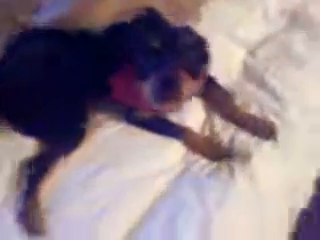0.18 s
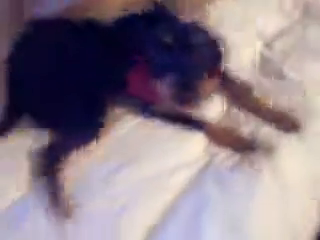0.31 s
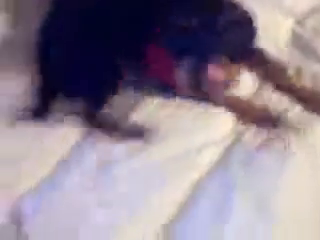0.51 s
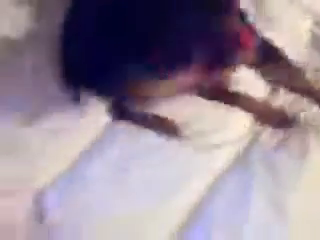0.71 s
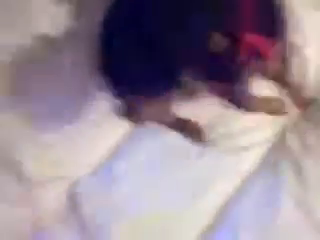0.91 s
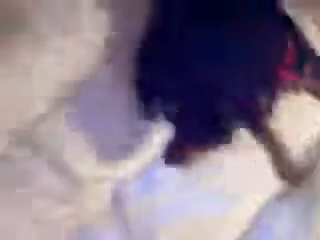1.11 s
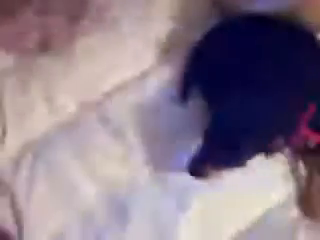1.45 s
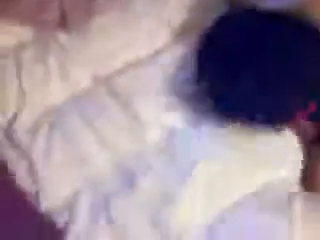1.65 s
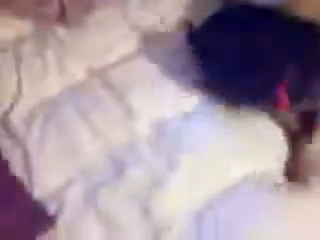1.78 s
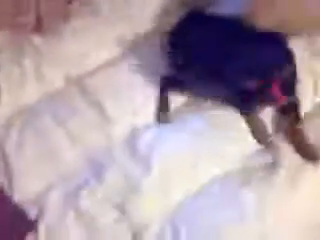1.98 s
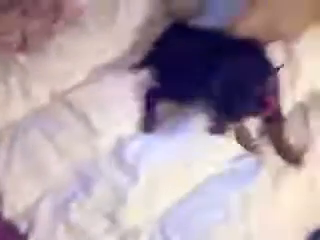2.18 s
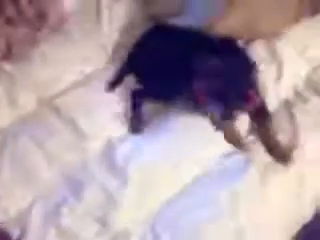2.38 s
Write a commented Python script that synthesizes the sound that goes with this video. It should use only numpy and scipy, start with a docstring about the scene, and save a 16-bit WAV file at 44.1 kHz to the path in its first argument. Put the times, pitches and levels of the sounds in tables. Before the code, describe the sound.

A puppy's teeth clack seven times in an even, quick run growing louder, over light duvet rustle; then a soft paw thump, cloth rubs and faint claw ticks, close stereo microphones in a small furnished room.

```python
"""A puppy plays on a duvet, close by in a small room. First comes a quick run of sharp clacks, most likely its teeth
snapping: each is a few contacts, built from knocks, rings of the mouth and bursts of noise. Cloth rubs beneath, and
one bright claw tick, a short noise burst, falls among the clacks. Then it turns round: paws thump as pulses and a
damped mattress ring, strokes of swelling noise rub the cloth, three faint contacts return and more claws tick near
the end. Two closely spaced microphones, cross-subtracted for stereo width, add their own hiss and a faint whine."""
import sys
import numpy as np
from scipy import signal
from scipy.fft import rfft, irfft, next_fast_len
from scipy.io import wavfile

SR = 44100
rng = np.random.default_rng(int(sys.argv[2]) if len(sys.argv) > 2 else 0)


def transcribe(u):
    """Save the signal u as a 16-bit wav file named by the first command-line argument.

    u: samples, shape (n,) or (channels, n), limited to [-1, 1]; the rate is SR.
    q: integer samples, one column per channel.
    """
    v = np.clip(np.atleast_2d(u).T, -1, 1)
    q = np.round(v * 32767).astype(np.int16)
    wavfile.write(sys.argv[1], SR, q)


N = 112454
FFT_SIZE = next_fast_len(N + 4096, real=True)  # the padding leaves room for delays

# Room
ECHO_S, ECHO_DB = 0.023, -27  # the nearest wall
ROOM_DB, ROOM_T60_S, ROOM_DELAY_S = -21.5, 0.23, 0.0057
# Bedding
CLOTH_FLUTTER_DB, FLUTTER_HZ = 1.57, 69.88
FIBRE_DB, FIBRE_RATE_HZ = 2.7, 1800
# Claws and paws
CLAW_DECAY_S = 0.0011
CLAW_SKIRT_DB = 18  # fall per octave either side of the centre
MATTRESS_HZ, MATTRESS_T60_S = 148, 0.048
CRUSH_DB = -14  # the filling crumples under the paw, relative to the slap
CRUSH_RISE_S, CRUSH_DECAY_S = 0.0031, 0.0095
# Teeth
MOUTH_T60_S = 0.022
MOUTH_RISE_HZ_PER_S = 24000  # the ring climbs as the jaws close
CONTACT_RISE_S, CRACK_DECAY_S = 0.00016, 0.0012
SCRAPE_DECAY_S, SCRAPE_TAIL_S, SCRAPE_TAIL_DB = 0.00047, 0.0043, -18
# Microphones
PORT_LAG_S = 0.00006  # the left microphone hears the puppy later
CROSS_DELAY_S = 0.000381
SELF_NOISE_DB = -63.5  # ahead of the cross-subtraction
WHINE_HZ, WHINE_DB = 12094, -79
TOP_HZ = 14050


def undb(db):
    """Decibels to an amplitude factor."""
    return 10 ** (np.asarray(db) / 20)


def bins():
    """Frequency of every spectral bin."""
    return np.fft.rfftfreq(FFT_SIZE, 1 / SR)


def curve(points):
    """A table over log frequency, read at every spectral bin."""
    hz, value = np.array(points, float).T
    return np.interp(np.log(bins() + 1), np.log(hz), value)


def response(points):
    """Causal (minimum-phase) frequency response of (hz, level_db) points, by folding the cepstrum."""
    cepstrum = irfft(np.log(undb(curve(points))), FFT_SIZE)
    cepstrum[1:FFT_SIZE // 2] *= 2
    cepstrum[FFT_SIZE // 2 + 1:] = 0
    return np.exp(rfft(cepstrum))


def filtered(x, h):
    """Apply a frequency response."""
    return irfft(rfft(x, FFT_SIZE) * h, FFT_SIZE)[..., :N]


def colour(x, points):
    """Filter that keeps the power of white noise."""
    h = response(points)
    return filtered(x, h / np.sqrt(np.mean(abs(h) ** 2)))


def pulse(points):
    """A single push with this spectrum and a peak of 1."""
    x = irfft(response(points), FFT_SIZE)[:N]
    return x / abs(x).max()


def ring(hz, t60, rise_hz_per_s=0):
    """One damped resonance whose pitch may climb."""
    t = np.arange(int(2 * t60 * SR)) / SR
    phase = 2 * np.pi * (hz + rise_hz_per_s * t / 2) * t
    return np.sin(phase) * np.exp(-np.log(1000) * t / t60)


def fade(decay_s):
    """Exponential decay from 1."""
    return np.exp(-np.minimum(np.arange(N) / SR / decay_s, 20))


def soften(x, rise_s):
    """Round off every attack."""
    return filtered(x, np.exp(-(np.pi * bins() * rise_s / 2) ** 2))


def strike(times, dbs, shape):
    """The same shape started at each time with its own level."""
    out = np.zeros(N)
    for s, db in zip(times, dbs):
        i = int(s * SR)
        out[i:i + len(shape)] += undb(db) * shape[:N - i]
    return out


def delay(x, s):
    """Delay by any time, down to a fraction of a sample."""
    return filtered(x, np.exp(-2j * np.pi * bins() * s))


def ports(x):
    """A point source as it reaches the left and right microphones."""
    return np.array([delay(x, PORT_LAG_S), x])


def spread_noise(diffuse):
    """Noise at the two microphones, partly from the puppy's direction and partly from all round."""
    share = np.clip(diffuse, 0, 1)
    direct = ports(rng.standard_normal(N))
    around = rng.standard_normal((2, N))
    return np.sqrt(1 - share) * direct + np.sqrt(share) * around


def walk(rate):
    """Random wander with a spread near 1: straight lines between `rate` random values a second."""
    steps = rng.standard_normal(N)
    return 1.39 * np.interp(np.arange(N) / SR * rate, np.arange(N), steps)


def room(x):
    """The short, faint tail of a softly furnished room: decaying noise convolved with the sound."""
    # Colour of the tail: hz, level_db
    tail_spectrum = [(100, -11), (400, -2), (1200, 6.5), (2500, -3.5), (5000, -7), (9000, -4), (14000, 1)]
    t = np.arange(N) / SR
    tail = rng.standard_normal((2, N)) * np.exp(-np.log(1000) * t / ROOM_T60_S) * (t > ROOM_DELAY_S)
    tail = colour(tail / np.sqrt(np.sum(tail[0] ** 2)), tail_spectrum)
    return undb(ROOM_DB) * signal.fftconvolve(x, tail, axes=1)[:, :N]


def bedding():
    """Each stroke swells and fades: the filling is pushed, the cover rubs unevenly and its fibres hiss."""
    # Strokes of fur and paws over the cloth: centre_s, half_length_s, muffled_push_db, rub_db, hiss_db
    strokes = [(0.146, 0.012, -61.5, -64.5, -62), (0.185, 0.043, -71, -68, -65),
               (0.297, 0.074, -77, -64, -61), (0.383, 0.057, -73, -66, -62),
               (0.474, 0.042, -73, -58.5, -60), (0.596, 0.075, -69.5, -59.5, -62.5),
               (0.72, 0.035, -64.5, -58, -60), (0.818, 0.034, -66, -62, -62.5),
               (0.895, 0.041, -63, -57.5, -59.5), (1.044, 0.055, -63.5, -60, -59.5),
               (1.136, 0.019, -63, -68, -86), (1.312, 0.12, -66.5, -62, -67), (1.384, .024, -63, -55, -73),
               (1.479, .045, -63, -57.5, -65.5), (1.63, 0.1, -69, -66.5, -69),
               (1.745, 0.034, -56.5, -62.5, -83), (1.821, 0.037, -61, -54.5, -54.5),
               (1.934, 0.057, -68, -64, -62.5), (2.087, 0.023, -69.5, -64.5, -63),
               (2.328, 0.17, -67, -65.5, -86), (2.464, 0.024, -61, -59.5, -69)]
    # Colour of the pushed filling: hz, level_db
    push_spectrum = [(60, -24), (200, -5), (400, 2.5), (600, -6), (1000, -9.5), (2500, -40.5)]
    # Colour of the rubbed cover: hz, level_db
    rub_spectrum = [(200, -16.5), (600, 4.5), (900, 1.5), (1400, 0), (2000, -4.5), (3000, -2), (4200, -8),
                    (5200, -13), (14000, -17.5)]
    # Colour of the hissing fibres: hz, level_db
    hiss_spectrum = [(1000, -6), (3000, -31), (4200, -20), (5200, -4.5), (6500, -6), (8500, 1),
                     (11000, -2.5), (14000, -9.5)]
    t = np.arange(N) / SR
    power = np.zeros((3, N))
    for centre, half, *dbs in strokes:
        power += undb(dbs)[:, None] ** 2 * np.exp(-((t - centre) / half) ** 2)
    push, rub, hiss = np.sqrt(power) * undb(CLOTH_FLUTTER_DB * walk(FLUTTER_HZ))
    fibres = undb(FIBRE_DB * (walk(FIBRE_RATE_HZ) - 1 / 2))
    pushed = colour(push * spread_noise(diffuse=0.079), push_spectrum)
    rubbed = colour(rub * fibres * spread_noise(diffuse=0.94), rub_spectrum)
    hissed = colour(hiss * fibres * spread_noise(diffuse=1.0), hiss_spectrum)
    return pushed + rubbed + hissed


def claws():
    """Thin bright ticks of fading noise as a claw slips off the weave."""
    # Claws catching the sheet: start_s, level_db, tick_centre_hz
    catches = [(0.438, -37, 9200), (2.4347, -39, 5500), (2.4440, -42, 4180), (2.4636, -52, 12000),
               (2.478, -51, 10800), (2.4890, -52.5, 10800)]
    slip = spread_noise(diffuse=0.84)
    out = np.zeros((2, N))
    for s, db, hz in catches:
        skirts = [(hz / 2 ** 2, -2 * CLAW_SKIRT_DB), (hz, 0), (2 * hz, -CLAW_SKIRT_DB)]
        out += colour(strike([s], [db], fade(CLAW_DECAY_S)) * slip, skirts)
    return out


def paws():
    """A soft slap on the cover, a brief crumple of the filling and a damped thud of the mattress."""
    # Paws landing on the mattress: start_s, thud_db, slap_db
    landings = [(1.349, -55, -46), (1.4634, -32.5, -29), (1.6120, -62, -64), (1.8320, -71, -47)]
    # Colour of the slap and the crumple: hz, level_db
    slap_spectrum = [(60, 9.5), (200, 9), (700, 0.5), (1400, 2), (2200, -15.5), (4000, -17), (6000, -25),
                     (14000, -42)]
    times, thud_db, slap_db = np.array(landings).T
    thud = strike(times, thud_db, ring(MATTRESS_HZ, MATTRESS_T60_S))
    slap = strike(times, slap_db, pulse(slap_spectrum))
    crush = soften(strike(times, slap_db + CRUSH_DB, fade(CRUSH_DECAY_S)), CRUSH_RISE_S)
    return ports(thud + slap) + colour(crush * spread_noise(diffuse=0.09), slap_spectrum)


def teeth():
    """Each contact knocks, rings the mouth, cracks and scrapes briefly as enamel slides on enamel."""
    # Tooth contacts: start_s, knock_db, mouth_ring_db, mouth_pitch_hz (at the start), crack_db, scrape_db
    contacts = [(0.2268, -34.5, -56, 1026, -44, -33.5), (0.2276, -41.5, -43.5, 1190, -40.5, -29.5),
                (.3640, -33.5, -59, 960, -44, -36), (0.365, -28, -49, 940, -28.5, -31.5),
                (.3670, -30.5, -32, 890, -32.5, -39), (0.3682, -49, -31.5, 1070, -56, -52),
                (0.5016, -27, -52, 940, -46, -44), (0.5037, -31.5, -41, 1037, -55, -42),
                (0.5054, -34, -36.5, 1042, -43, -50), (0.6184, -27, -70, 1160, -35, -47),
                (0.6202, -30, -63, 1140, -43, -36.5), (0.6216, -38, -26, 1066, -41, -43.5),
                (0.7371, -24.5, -68, 1030, -35, -48), (.7410, -25.5, -41.5, 1045, -38.5, -40),
                (0.7425, -35, -26.5, 997, -35.5, -39), (0.8702, -23, -43, 1040, -36, -47),
                (0.8724, -23.5, -29.5, 960, -34, -37.5), (.9980, -22, -34, 1180, -22, -22),
                (1.0010, -19, -31.5, 1074, -18, -15), (2.152, -42, -80, 1280, -69, -72),
                (2.1554, -33, -63, 1650, -46.5, -76), (2.307, -45.5, -59.5, 1250, -62, -70)]
    # Colour of the knock: hz, level_db
    knock_spectrum = [(60, -32), (200, -1.5), (420, 4), (700, -3.5), (1100, 3.5), (1600, 4), (2500, -3),
                      (4000, -14), (6000, -6.5), (14000, -32.5)]
    # Colour of the enamel crack: hz, level_db
    crack_spectrum = [(200, -14), (1200, -3.5), (2200, -1), (3500, 2), (5200, -10.5), (6500, -6),
                      (8000, -19.5), (14000, -7.5)]
    # Colour of the enamel scrape: hz, level_db
    scrape_spectrum = [(2000, -20), (5000, -9), (7000, -5), (8800, 11.5), (10200, 2.5), (11700, 5),
                       (13800, -2)]
    times, knock_db, mouth_db, mouth_hz, crack_db, scrape_db = np.array(contacts).T
    knock = strike(times, knock_db, pulse(knock_spectrum))
    mouth = np.zeros(N)
    for s, db, hz in zip(times, mouth_db, mouth_hz):
        mouth += strike([s], [db], ring(hz, MOUTH_T60_S, MOUTH_RISE_HZ_PER_S))
    crack = soften(strike(times, crack_db, fade(CRACK_DECAY_S)), CONTACT_RISE_S)
    scrape_fade = fade(SCRAPE_DECAY_S) + undb(SCRAPE_TAIL_DB) * fade(SCRAPE_TAIL_S)
    scrape = soften(strike(times, scrape_db, scrape_fade), CONTACT_RISE_S)
    cracked = colour(crack * spread_noise(diffuse=0.1), crack_spectrum)
    scraped = colour(scrape * spread_noise(diffuse=1.0), scrape_spectrum)
    return ports(knock + mouth) + cracked + scraped


def scene():
    """The puppy on its bedding, with one echo and the tail of the room."""
    puppy = bedding() + claws() + paws() + teeth()
    return puppy + undb(ECHO_DB) * delay(puppy, ECHO_S) + room(puppy)


def record(dry):
    """Microphones hiss; each side subtracts the delayed other and bass is restored; a faint electronic whine."""
    # Colour of the microphone hiss: hz, level_db
    hiss_spectrum = [(30, -9.5), (100, 15), (180, 6.5), (350, 10), (700, 1), (1500, -2.5), (3000, -4),
                     (5000, -9), (8000, -6), (12000, -3.5), (14000, -5)]
    # Share of the other microphone subtracted: hz, share (0 to 1)
    cross_share = [(30, .985), (2800, .985), (5000, .8), (8000, .35), (14000, .3)]
    # Equaliser after the subtraction: hz, gain_db
    mic_eq = [(25, -12), (60, -7), (110, 2.5), (170, 5.5), (350, 0.5), (700, -5), (1300, -3.5), (4000, -2),
              (14000, -1)]
    mics = dry + undb(SELF_NOISE_DB) * colour(rng.standard_normal((2, N)), hiss_spectrum)
    other = filtered(delay(mics[::-1], CROSS_DELAY_S), np.clip(curve(cross_share), 0, 1))
    wide = filtered(mics - other, response(mic_eq))
    wobble = 0.5 * walk(32)  # phase, radians
    whine = undb(WHINE_DB) * np.sin(2 * np.pi * WHINE_HZ * np.arange(N) / SR + wobble)
    low_pass = signal.ellip(10, .2, 70, TOP_HZ, fs=SR, output="sos")
    return signal.sosfilt(low_pass, wide + ports(whine))


dry = scene()
out = record(dry)
transcribe(out)
```